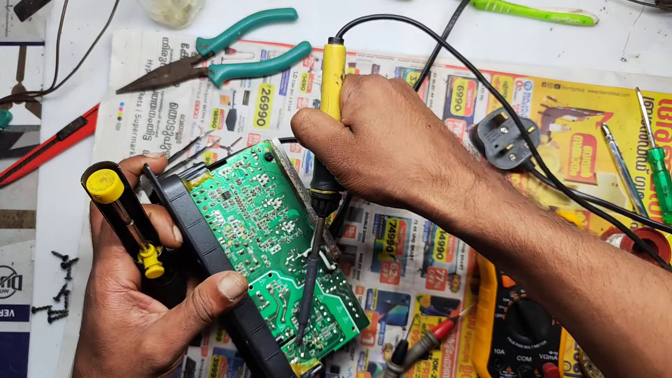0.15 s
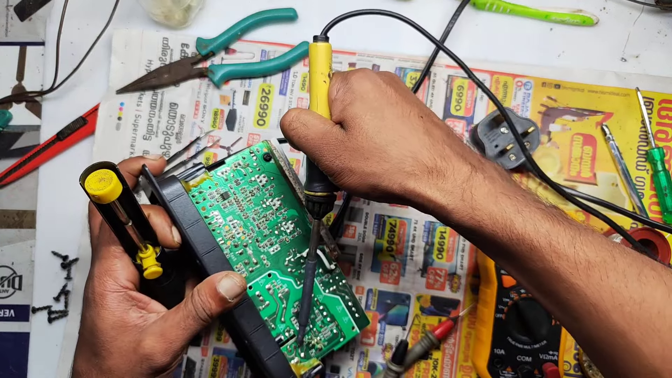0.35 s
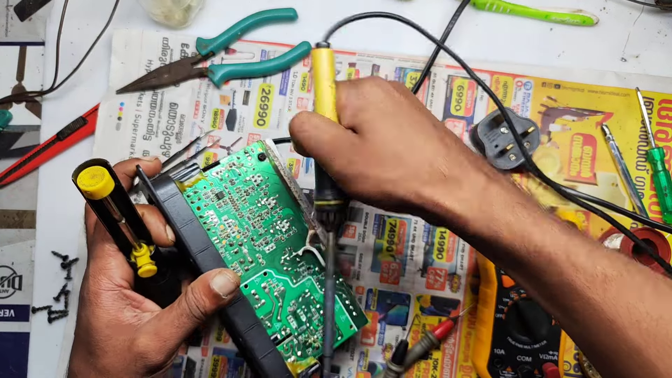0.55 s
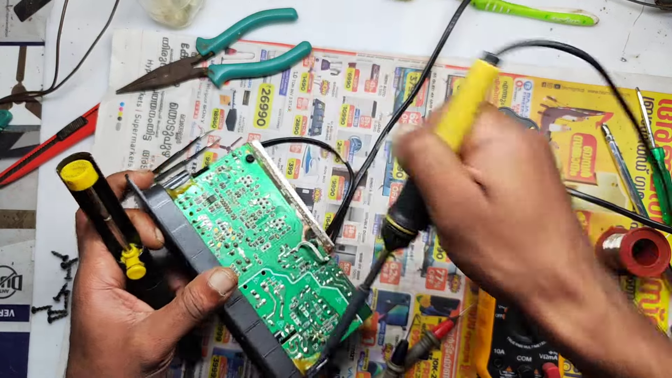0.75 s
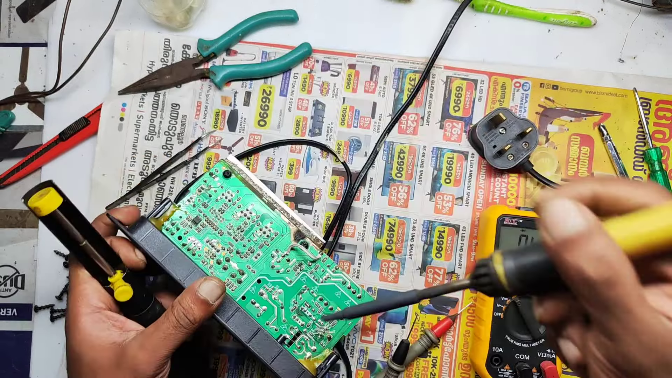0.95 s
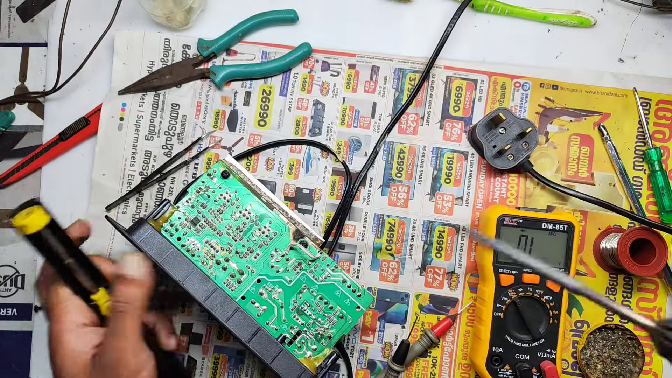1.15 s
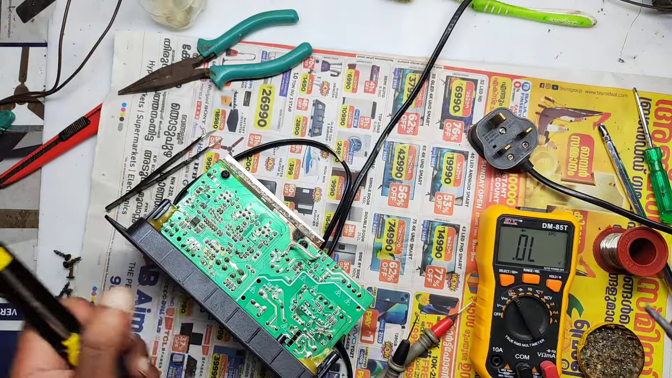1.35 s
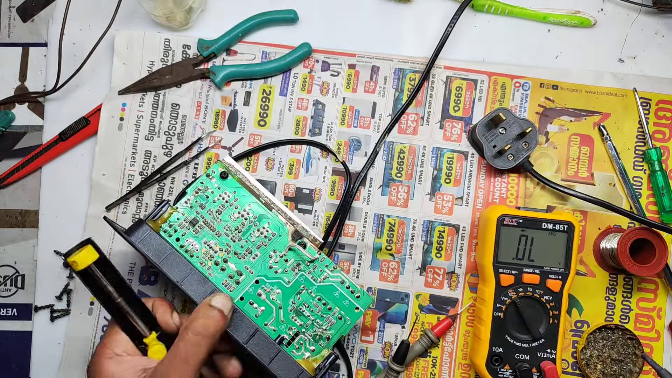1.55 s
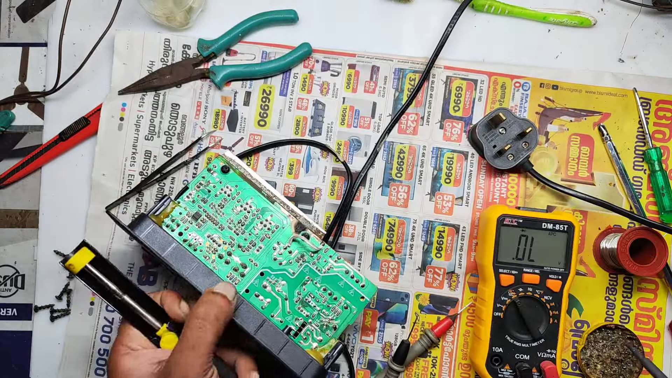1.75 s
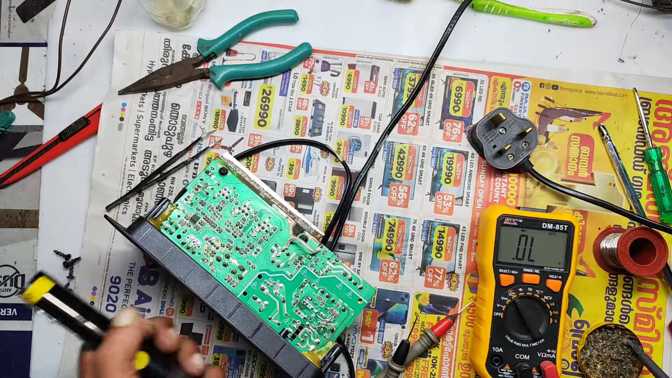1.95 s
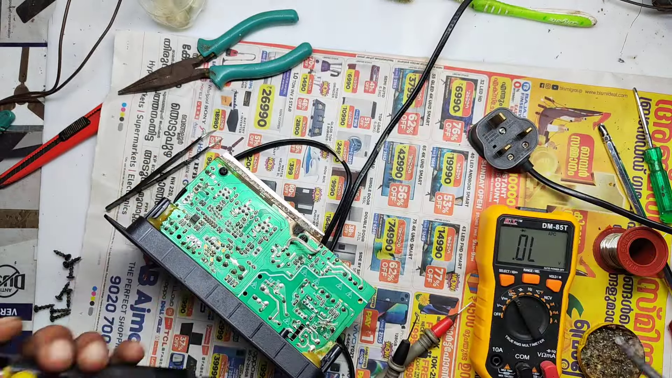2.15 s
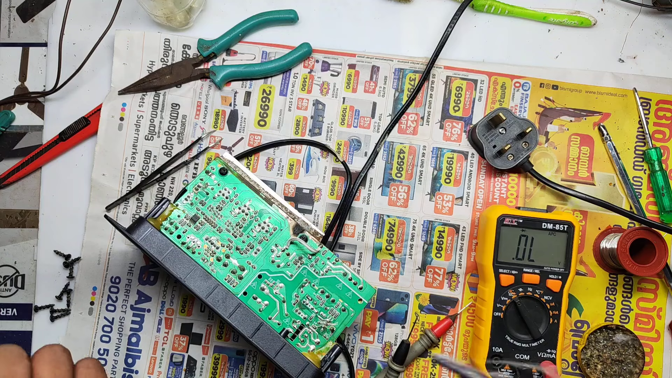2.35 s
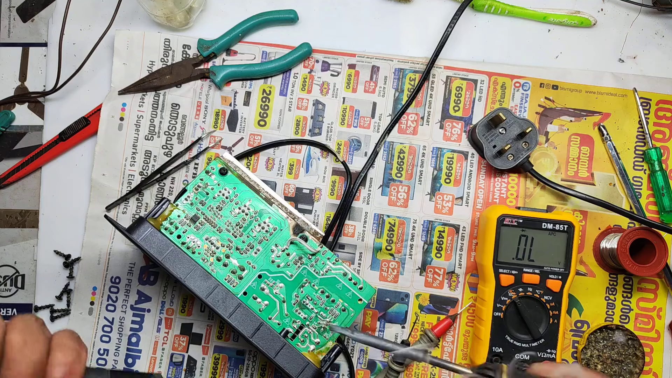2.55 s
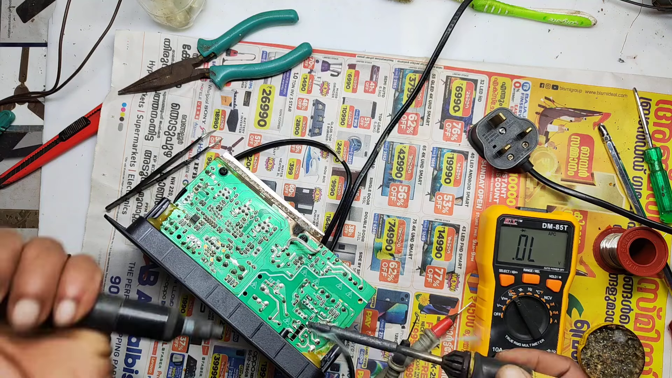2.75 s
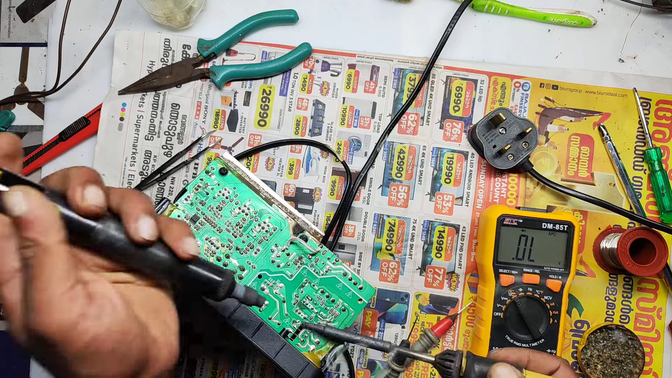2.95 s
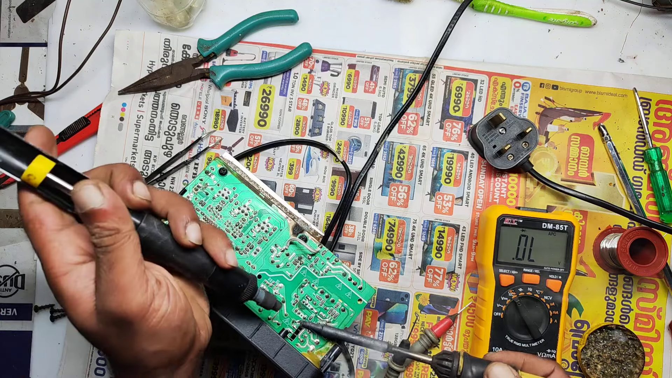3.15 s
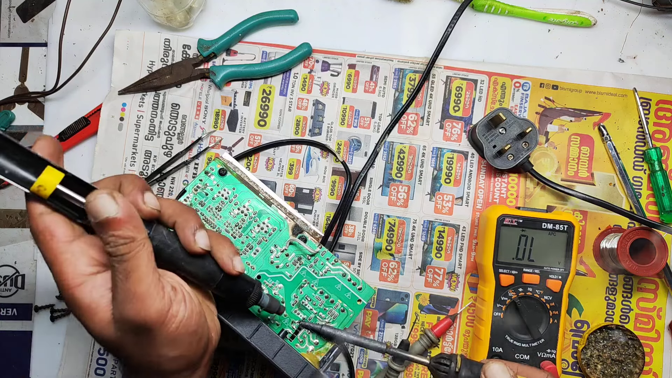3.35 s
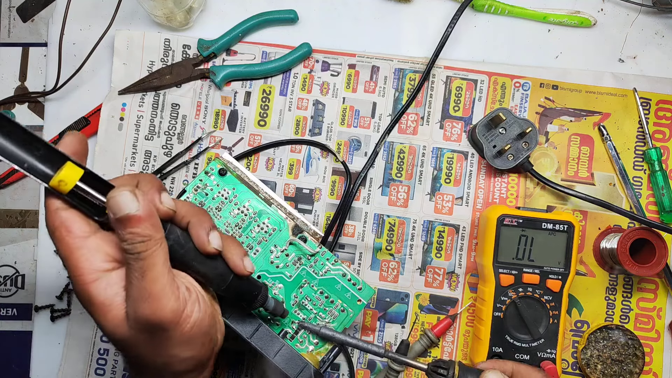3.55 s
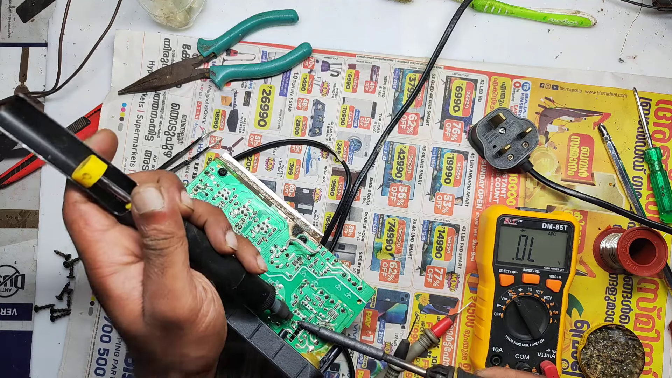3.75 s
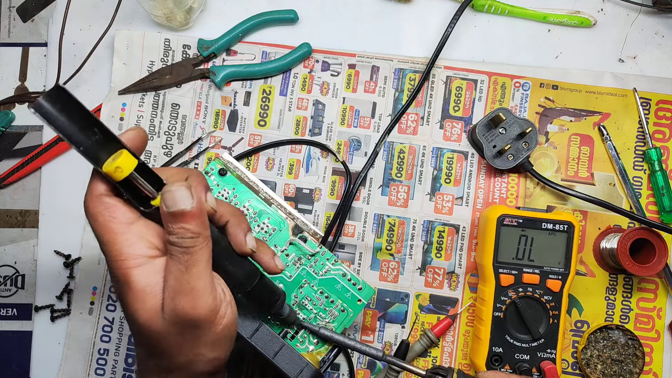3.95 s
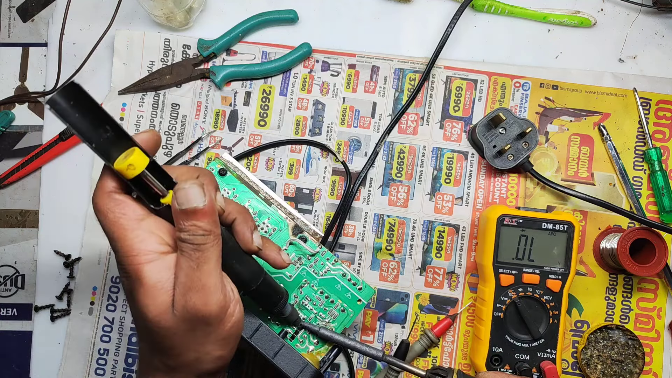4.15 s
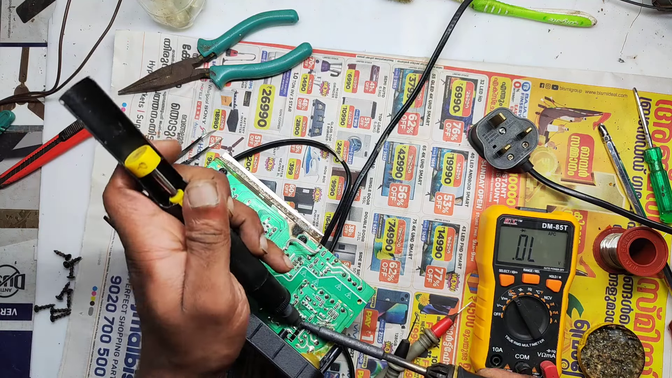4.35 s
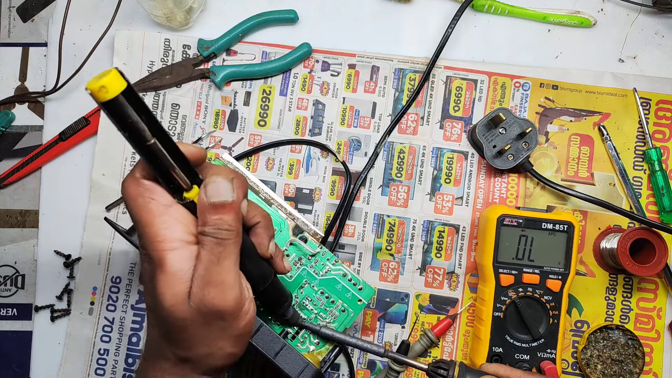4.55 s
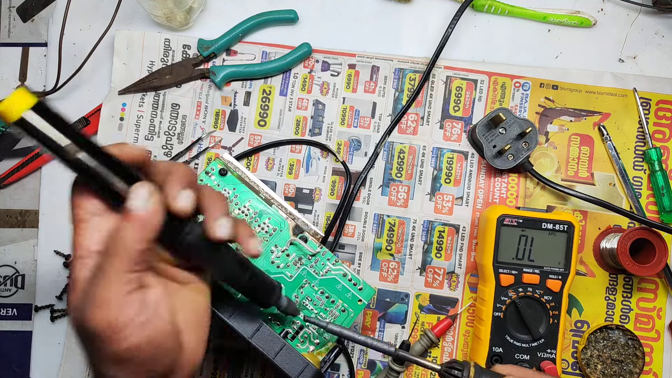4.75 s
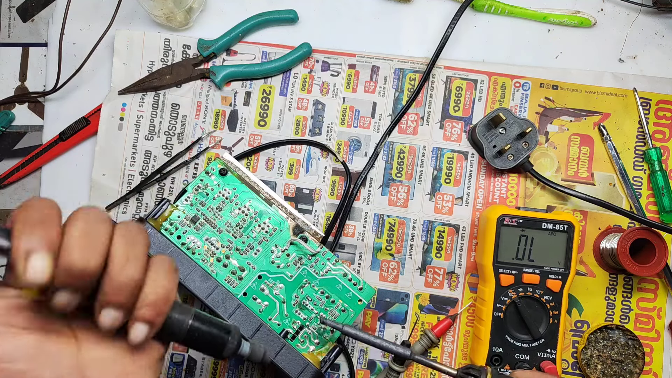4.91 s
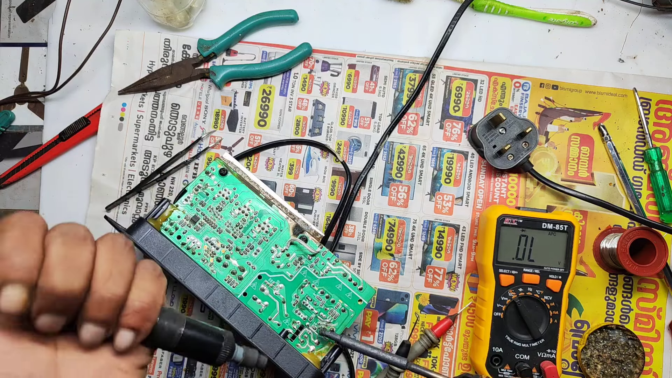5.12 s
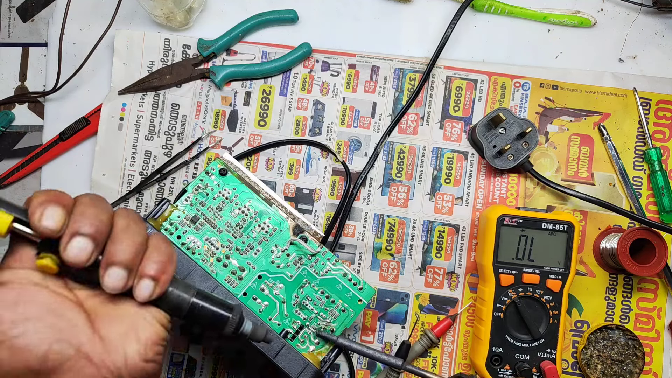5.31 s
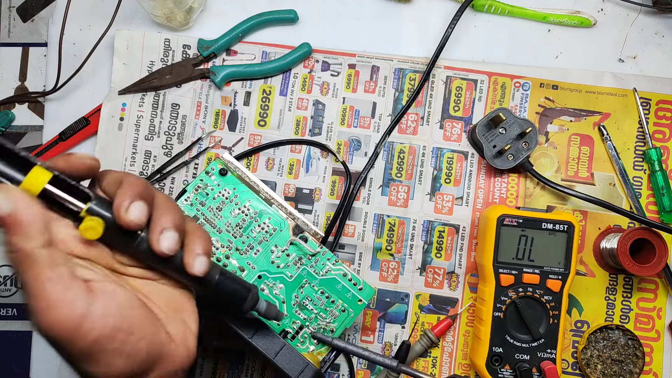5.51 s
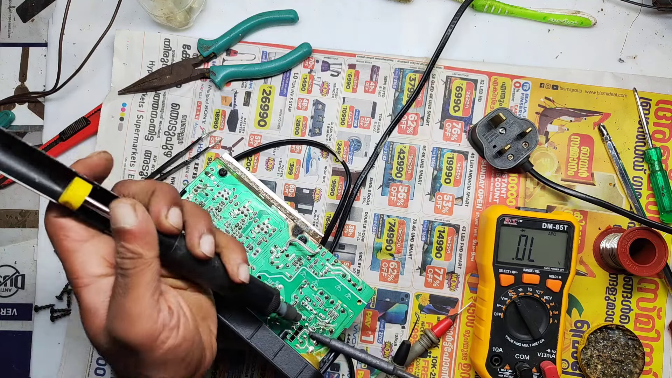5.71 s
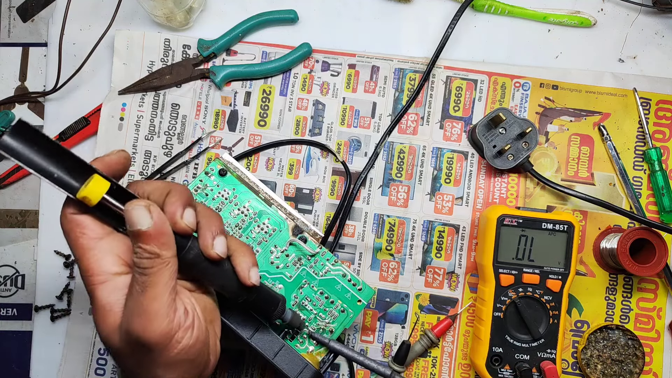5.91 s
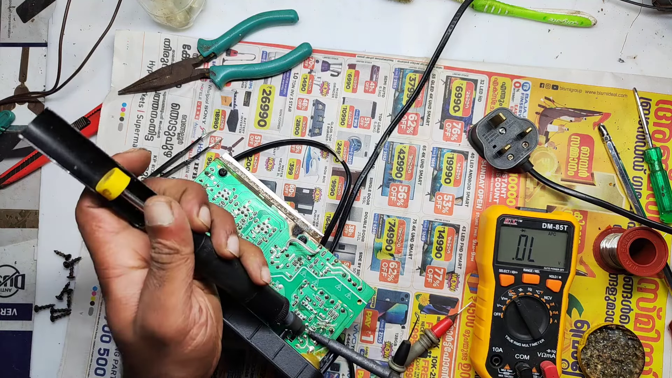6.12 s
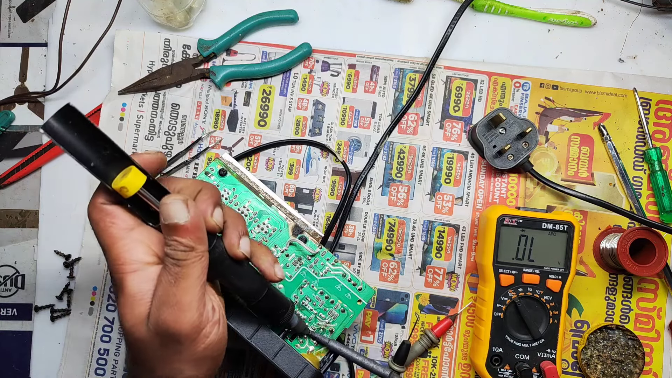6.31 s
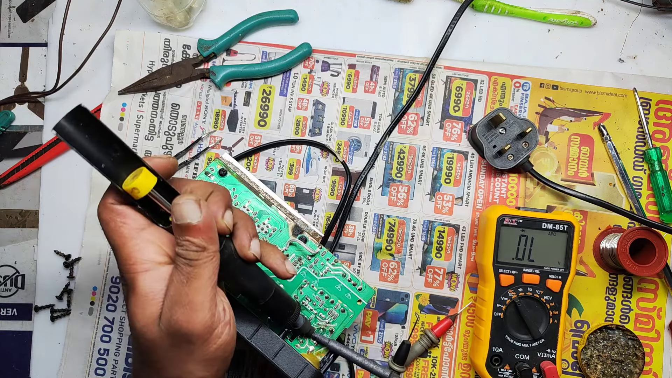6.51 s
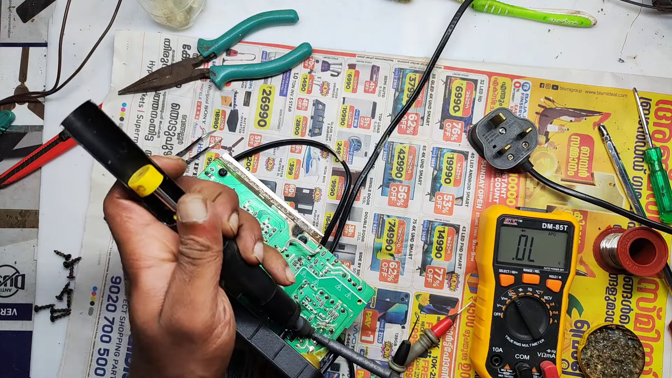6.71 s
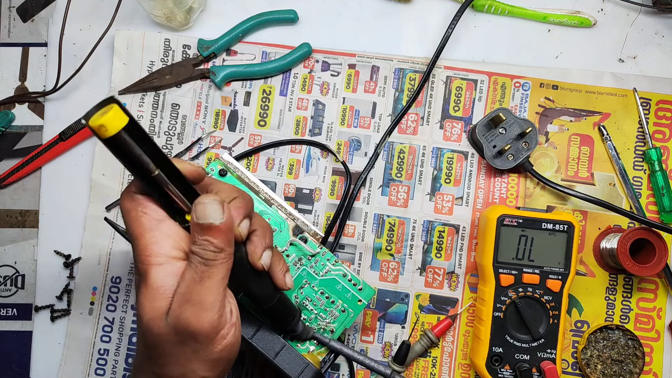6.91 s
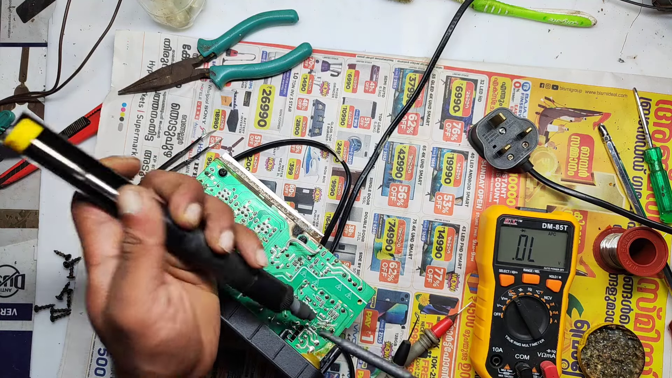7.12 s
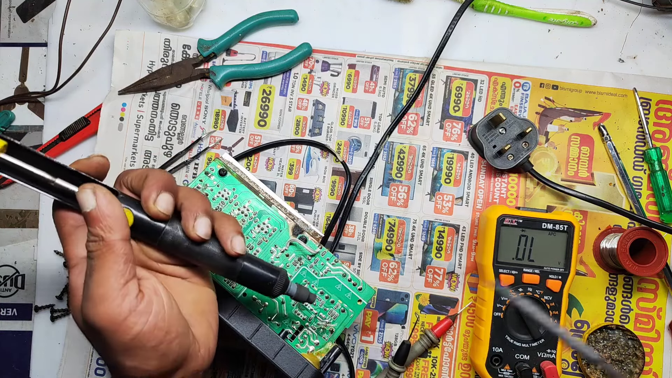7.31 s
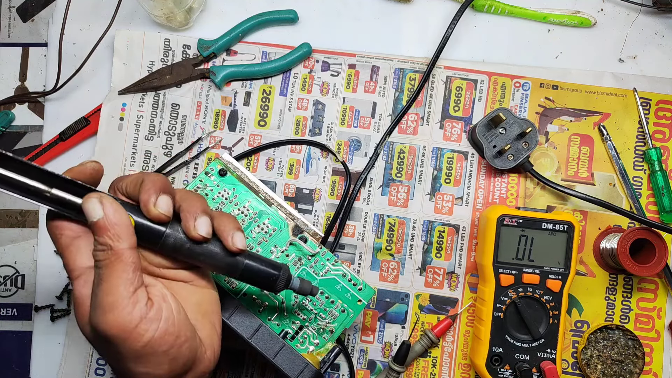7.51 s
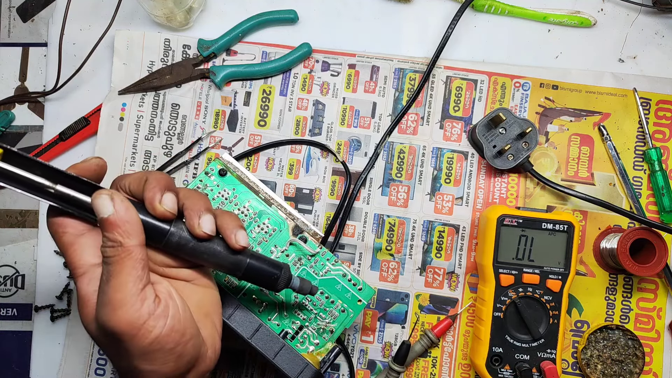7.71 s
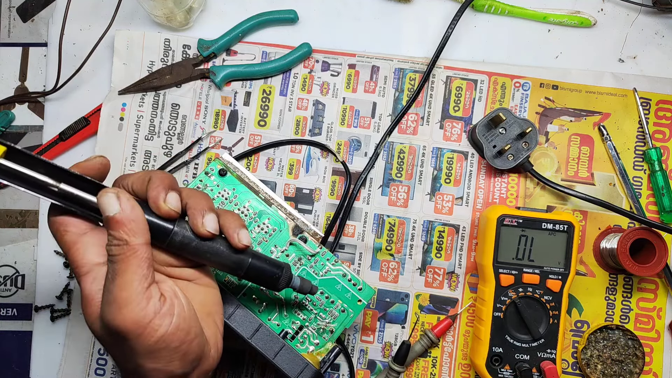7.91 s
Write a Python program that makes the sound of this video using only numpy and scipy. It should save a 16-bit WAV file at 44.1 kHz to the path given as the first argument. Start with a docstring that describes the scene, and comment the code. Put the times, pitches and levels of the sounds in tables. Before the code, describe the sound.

Workbench knocks and paper rustle, a brief hot sizzle, then a spring-loaded solder sucker cocked and fired twice with sharp snaps and airy thumps.

```python
"""Desoldering at a workbench

First, and more sparsely later, hands shift the board and tools over newspaper in a small room; the hot iron
sizzles briefly before a spring-loaded solder sucker is cocked twice and fired twice against a circuit board.
Cocking is a sliding hiss and tone, a latch snap and a plunger knock; firing is a click, a rush of air and a thump.
Noise bursts shaped by colour make the contacts, air and paper; fading sine waves make the ringing parts."""
import sys
import numpy as np
from scipy import signal
from scipy.fft import rfft, irfft, next_fast_len
from scipy.io import wavfile
from scipy.ndimage import map_coordinates

SR = 44100
rng = np.random.default_rng(int(sys.argv[2]) if len(sys.argv) > 2 else 0)


def transcribe(u):
    """Save the signal u as a 16-bit wav file named by the first command-line argument.

    u: samples, shape (n,) or (channels, n), limited to [-1, 1]; the rate is SR.
    q: integer samples, one column per channel.
    """
    v = np.clip(np.atleast_2d(u).T, -1, 1)
    q = np.round(v * 32767).astype(np.int16)
    wavfile.write(sys.argv[1], SR, q)


N = 355887
TIME = np.arange(N) / SR  # seconds from the start
AGE = np.arange(SR // 2) / SR  # seconds since a blow; t60 below is the time to fade by 60 dB


def amp(db):
    """Turn decibels into gain."""
    return 10 ** (np.asarray(db) / 20)


def along(points, hz):
    """Read a curve of (f/Hz, value) points at any frequency, on a log axis."""
    f, value = np.transpose(points)
    return np.interp(np.log(hz + 1), np.log(f + 1), value)


def unit(x):
    """Scale to rms 1, so that levels compare."""
    return x / np.sqrt(np.mean(x ** 2) + 1e-20)


def blow(x):
    """Scale a short sound to an average energy of 1 per channel."""
    return unit(x) / np.sqrt(x.shape[-1])


def add(track, start, x):
    """Mix a sound into the track from a start time in seconds."""
    part = track[:, round(start * SR):][:, :x.shape[-1]]
    part += x[..., :part.shape[-1]]


def colour(x, spectrum):
    """Filter to the given spectrum with minimum phase, so nothing sounds before its cause."""
    m = 2 * next_fast_len(x.shape[-1] // 2 + SR // 10)
    gain_db = along(spectrum, np.fft.rfftfreq(m, 1 / SR))
    # Folding the cepstrum moves the filter's response to after time zero
    cepstrum = irfft(np.log(amp(gain_db)))
    cepstrum[1:m // 2] *= 2
    cepstrum[m // 2 + 1:] = 0
    response = np.exp(rfft(cepstrum))
    return irfft(rfft(x, m) * response, m)[..., :x.shape[-1]]


def noise(size, alike):
    """Stereo white noise; alike is the share of power common to both sides."""
    common = rng.standard_normal(size)
    separate = rng.standard_normal((2, size))
    return np.sqrt(alike) * common + np.sqrt(1 - alike) * separate


def wobble(rate):
    """A smooth random curve through rate random points a second."""
    return map_coordinates(rng.standard_normal(int(N * rate / SR) + 4), [TIME * rate])


def strike(spectrum, t60, scatter):
    """A sharp contact followed by a short rattle of the touching parts."""
    click = AGE == 0
    rattle = blow(noise(len(AGE), alike=0.46) * amp(-60 * AGE / t60))
    return blow(colour(click + scatter * rattle, spectrum))


def tube(hz, t60):
    """A hollow body rings strongly for a few milliseconds after a blow."""
    build_up = 1 - np.exp(-AGE / 0.0015)
    return blow(np.cos(2 * np.pi * hz * AGE) * amp(-60 * AGE / t60) * build_up)


def ring(modes, blur_hz):
    """Fading tones whose phases wander at random, which makes the ringing rough rather than pure."""
    hz, db, t60 = np.transpose(modes)[..., None]
    steps = rng.standard_normal((2, len(modes), len(AGE))) * np.sqrt(2 * np.pi * blur_hz / SR)
    drift = np.cumsum(steps, -1)
    tones = amp(db - 60 * AGE / t60) * np.sin(2 * np.pi * hz * AGE + drift)
    return blow(np.sum(tones, axis=1))


# Colour of a low push on the board: (f/Hz, relative level/dB)
PUSH_COLOUR = [(25, -20), (60, -5.5), (125, 3.5), (200, -8), (300, 0.5), (500, -11.5), (1000, -33),
               (4000, -72)]
# Ringing of the board's case: (f/Hz, relative level/dB, t60/s)
BOARD_MODES = [(71.6, -24.5, 0.047), (121, -4, .14), (135.8, 2, 0.2), (195.8, -7.5, 0.27), (226, -3, 0.18),
               (278.7, -8.5, 0.18), (405, -19.5, 0.31)]


def thump(ring_share, t60):
    """A low push on the board, which rings in its case."""
    push = blow(colour(noise(len(AGE), alike=0.98) * amp(-60 * AGE / t60), PUSH_COLOUR))
    hz, db, life = np.transpose(BOARD_MODES)[..., None]
    tones = amp(db - 60 * AGE / life) * np.sin(2 * np.pi * hz * AGE)
    case = np.sum(tones, axis=0) * (1 - np.exp(-AGE / 0.012))  # the ringing builds up
    return blow(push + ring_share * blow(case))


# How long the room's echo lasts: (f/Hz, t60/s)
ROOM_DECAY = [(100, 0.46), (400, 0.24), (1000, 0.39), (3000, 0.23), (8000, 0.25), (14000, 0.28)]


def in_room(x, wet_db, left_db=3.0, lead=.00026):
    """Sound reaches the right lead seconds late; left_db lifts left and lowers right; the room echoes diffusely."""
    hz, t, z = signal.stft(rng.standard_normal((2, len(AGE))), SR, nperseg=256)
    alike = np.exp(-hz / 900)[:, None]  # long waves reach both microphones alike
    z[1] = alike * z[0] + np.sqrt(1 - alike ** 2) * z[1]
    decay = amp(-60 * t / along(ROOM_DECAY, hz)[:, None])
    tail = signal.istft(z * decay, SR, nperseg=256)[1][:, :len(AGE)]
    tail = blow(tail * (1 - np.exp(-AGE / 0.0012)))
    echo = signal.fftconvolve(x, tail, axes=1)[:, :x.shape[-1]]
    late_right = np.pad(x[1], (round(lead * SR), 0))[:x.shape[-1]]
    direct = np.array([x[0], late_right]) * amp([[left_db], [-left_db]])
    return direct + amp(wet_db) * echo


# Level of the low rumble, before its small random sway: (t/s, level/dB)
RUMBLE_LEVEL = [(0, -65.5), (2.3, -65), (3.7, -64), (4.3, -66), (5.7, -66), (8.07, -67)]
# Colours of the rumble and the hiss: (f/Hz, relative level/dB)
RUMBLE_COLOUR = [(15, -51.5), (25, -18), (130, -1.5), (151, -4), (171, -12), (202, -1), (257, -12),
                 (299, -8.5), (369, -10), (401, -5.5), (700, -20), (910, -52), (1540, -120)]
HISS_COLOUR = [(100, -13), (500, -3), (1000, -0.5), (2000, -5.5), (4000, -10.5), (7300, -21.5), (9500, -15),
               (12000, -10.5), (14500, -18)]


def background(hiss_db=-73):
    """A low, uneven rumble, much of it common to both sides, under a faint steady hiss."""
    sway = amp(np.interp(TIME, *np.transpose(RUMBLE_LEVEL)) + wobble(11))
    rumble = sway * unit(colour(noise(N, alike=0.67), RUMBLE_COLOUR))
    hiss = unit(colour(noise(N, alike=0.26), HISS_COLOUR))
    return (rumble + amp(hiss_db) * hiss) * amp([[.9], [-.9]])  # dB: slightly louder on the left


SLIDE_RANGE_DB = 24  # a slide swells by this much over its rise and fades by it over its fall


def slide_gain(peak, rise, fall):
    """Loudness of a movement that speeds up until its peak time and then slows down."""
    return amp(-SLIDE_RANGE_DB * np.maximum((peak - TIME) / rise, (TIME - peak) / fall))


# Hands, board and cable slide over paper:
# (fastest at t/s, rise/s, fall/s, level/dB, brightness/dB per octave)
SLIDES = [(0.054, 0.044, 0.072, -66.5, 1.5), (.585, 0.099, 0.097, -53, 1.5), (.675, 0.047, 0.062, -54.5, 2),
          (.722, 0.079, 0.082, -54, 2.5), (.80, .05, .45, -54.5, 2), (1.065, .05, 0.073, -54, 1),
          (1.365, .18, 0.17, -52.5, -2.8), (1.652, 0.15, 0.052, -54, 0.9),
          (1.741, 0.062, 0.068, -61.5, 1.5), (2.14, .1, .27, -67, 1), (2.47, 0.23, 0.19, -61.5, 0),
          (3.05, 0.17, 0.2, -69, 3), (4.679, 0.16, 0.12, -63.5, 3), (5.7, 0.25, 0.21, -71.5, 2),
          (5.939, .14, 0.053, -70, -2), (7.05, 0.19, 0.18, -68, 1.5)]
# Colour of rubbed paper: (f/Hz, relative level/dB)
PAPER_COLOUR = [(60, -18), (200, -11.5), (400, 0), (700, -3.5), (1200, 0), (2000, -4), (3500, -11),
                (5000, -14.5), (7500, -24.5), (11000, -21.5), (14500, -28)]
PAPER_PIVOT_HZ = 1300  # brightness tilts the paper's colour about this point


def rubbing():
    """Each slide swells and fades; the paper rubs in uneven slips, brighter or duller with the contact."""
    out = np.zeros((2, N))
    for peak, rise, fall, db, tilt_db in SLIDES:
        start = max(peak - 2 * rise, 0)
        end = peak + 2 * fall
        gain = slide_gain(peak, rise, fall)[round(start * SR):round(end * SR)]
        tilted = [(hz, band_db + tilt_db * np.log2(hz / PAPER_PIVOT_HZ)) for hz, band_db in PAPER_COLOUR]
        paper = unit(colour(noise(len(gain), alike=0.1), tilted))
        add(out, start, amp(db) * gain * paper)
    slips = unit(amp(2.4 * wobble(400) + .9 * wobble(40)))  # fast and slow unevenness
    return in_room(slips * out, wet_db=-6.5, left_db=1.0, lead=0)


# Board and tools touch: (t/s, knock level/dB, body resonance f/Hz, thud level/dB, tick level/dB)
TOUCHES = [(.472, -44, 400, -32, -47), (.515, -26.5, 1180, -20.5, -22.5), (.528, -22.5, 1310, -17.5, -34),
           (.776, -28.5, 1400, -45, -30.5), (.821, -29, 406, -23.5, -50), (.999, -32, 1130, -46, -46),
           (1.360, -26.5, 1750, -55, -51), (1.3855, -12.5, 1930, -36, -36), (1.495, -29, 423, -28, -48),
           (1.5315, -32.5, 630, -32, -44), (1.544, -39, 2780, -50, -26), (1.558, -23.5, 970, -40, -51),
           (1.601, -28.5, 1390, -55, -37), (1.654, -28, 1320, -38, -48), (1.814, -30.5, 2570, -29.5, -47),
           (1.877, -34.5, 330, -24.5, -54), (1.916, -30, 340, -23.5, -47), (2.033, -35.5, 3880, -43, -22.5),
           (2.485, -28.5, 550, -36.5, -40), (2.547, -28.5, 2800, -35, -35.5),
           (2.905, -33.5, 446, -32.5, -47), (3.110, -36, 1075, -44, -41.5), (3.259, -36.5, 3500, -32, -35),
           (3.887, -36.5, 676, -32, -55), (5.538, -37, 1230, -31, -42.5), (5.959, -32.5, 298, -27, -49),
           (6.068, -30, 610, -33, -52), (6.354, -41, 1076, -45, -62), (6.454, -38, 1170, -38, -56),
           (7.03, -47, 400, -32.5, -60)]
# Colours of a knock and of a hard tick, the tick also used further down: (f/Hz, relative level/dB)
KNOCK_COLOUR = [(80, -27), (350, 13), (700, 8), (1400, 4), (3500, -1), (6000, -17.5), (14000, -47.5)]
TICK_COLOUR = [(500, -29), (3000, -2), (5000, 2.5), (7300, -4.5), (10000, 0.5), (14500, -3.5)]


def handling():
    """Each touch has a knock with its own resonance, a thud of the case and a hard tick."""
    out = np.zeros((2, N))
    for s, knock_db, body_hz, thud_db, tick_db in TOUCHES:
        contact = strike(KNOCK_COLOUR, t60=.025, scatter=1.6)
        body = .7 * tube(body_hz, t60=14 / body_hz)
        knock = amp(knock_db) * (contact + body)
        thud = amp(thud_db) * thump(ring_share=0.47, t60=0.025)
        tick = amp(tick_db) * strike(TICK_COLOUR, t60=0.038, scatter=4.5)
        add(out, s, in_room(knock + thud + tick, wet_db=-3, left_db=1, lead=.00015))
    return out


# The hot tip is wiped: (start t/s, lifted at t/s, level/dB)
WIPE = (1.832, 2.063, -53)
# Colour of the steam: (f/Hz, relative level/dB)
STEAM_COLOUR = [(300, -23), (2000, -7.5), (4500, -4), (7000, -6), (10000, 3), (14000, 1.5)]
WIPE_ATTACK_S, WIPE_T60_S = 0.14, 0.25  # steam builds up, then dies once the tip lifts


def sizzle():
    """The hot tip is wiped and spits: bright noise flickers quickly in level, like a fine crackle."""
    start, lifted, db = WIPE
    build_up = np.clip((TIME - start) / WIPE_ATTACK_S, 0, 1)
    steam = build_up * amp(db - 60 * np.maximum(TIME - lifted, 0) / WIPE_T60_S)
    flicker = amp(3.5 * wobble(990))
    spit = unit(flicker * colour(noise(N, alike=.4), STEAM_COLOUR))
    return steam * in_room(spit, wet_db=-9, left_db=.5)


# The piston is pushed down the barrel: (start t/s, end t/s, level/dB that hiss and tone are set against)
STROKES = [(2.413, 2.59, -67.5), (5.037, 5.237, -63.5)]


def sliding(start_hz=1750, end_hz=980, width_hz=150):
    """Air hisses past the piston; the lengthening air column sounds its first and third quarter-wave tones."""
    out = np.zeros((2, N))
    leak_colour = [(300, -15.5), (1500, 1.5), (2600, 2), (6000, -11), (14000, -12.5)]  # f/Hz, level/dB
    for start, end, db in STROKES:
        travel = np.clip(AGE / (end - start), 0, 1)
        # Wavelength grows with the air column, so it is 1 / pitch that moves with travel
        pitch = 1 / (1 / start_hz + travel ** 0.89 * (1 / end_hz - 1 / start_hz))
        phase = 2 * np.pi * np.cumsum(pitch) / SR
        # A random level makes each tone breathy
        first = wobble(2 * width_hz)[:len(AGE)] * np.sin(phase)
        third = wobble(2 * width_hz)[:len(AGE)] * np.sin(3 * phase)
        column = 1.15 * first + 1.7 * travel ** 2 * third
        leak = unit(colour(noise(len(AGE), alike=0.35), leak_colour))
        hiss = amp(9.5 - 14 * travel) * leak  # weakens along the stroke
        push = np.minimum(AGE / 0.055, 1) * (travel < 1)
        add(out, start, amp(db) * in_room(push * (hiss + column), wet_db=-9.5))
    return out


# The latch catches the piston; the code trims the level a little:
# (t/s, level before trim/dB, left lift and right cut/dB, tube ring against the crack/dB)
LATCHES = [(2.5976, 3.5, 1.5, -10), (5.2421, 3.5, 4, -4.5)]
# The plunger flies back to its stop; the code trims the level a little:
# (t/s, level before trim/dB, left lift and right cut/dB, tube ring against the knock/dB,
#  flight/s, let go this long before t/s, let-go tick level/dB)
RETURNS = [(2.7130, -2.5, 1.5, -2, .011, 0.015, -20.5), (5.3616, -2.5, 2.5, 5, 0.012, 0.017, -17)]
# Colours of the latch and of the plunger's stop: (f/Hz, relative level/dB)
LATCH_COLOUR = [(40, -47.5), (150, -28.5), (400, -19.5), (800, -18), (1500, -27), (2200, -12.5),
                (2800, -3.5), (3600, -1.5), (5000, -9), (6000, -7.5), (7300, -20.5), (9000, -8),
                (12000, -8), (14500, -13.5)]
STOP_COLOUR = [(40, -48), (160, -22.5), (250, -4), (350, -1), (800, -14), (1300, -30), (2200, -17),
               (2800, -3), (3500, -37.5), (4500, -25), (5700, -10.5), (7300, -22), (9000, -14.5),
               (14500, -20)]
# Ringing of the spring and of the barrel: (f/Hz, relative level/dB, t60/s)
SPRING_MODES = [(383.6, -8.5, 0.16), (823.4, -10, 0.13), (2960, -3.5, 0.12), (3480, -6, 0.066),
                (3700, -4.5, 0.21), (4160, -12, .15), (5730, -10.5, 0.19), (8930, -7, .1)]
BARREL_MODES = [(370, -10, 0.2), (824, -3.5, 0.33), (816, 29, 0.073), (2570, -15, 0.053),
                (2610, -31, 0.061), (3550, -2, 0.42), (4700, -2, 0.17), (5670, -11, .13)]


def cocking():
    """The latch snaps shut; the freed plunger scrapes back ever louder and strikes the barrel."""
    out = np.zeros((2, N))
    for s, db, left_db, tube_db in LATCHES:
        # The catch rides over its edge just before the snap
        add(out, s - .0016, amp(db - 15) * strike(LATCH_COLOUR, t60=0.0081, scatter=4))
        crack = strike(LATCH_COLOUR, t60=.018, scatter=1.1)
        hollow = tube(hz=2790, t60=.016) + .65 * tube(hz=3480, t60=.009)
        spring = amp(-15.0) * ring(SPRING_MODES, blur_hz=22)
        snap = crack + amp(tube_db) * hollow + spring
        add(out, s, amp(db - 2.35) * in_room(snap, wet_db=-7.0, left_db=left_db))
    for s, db, left_db, tube_db, flight, let_go, tick_db in RETURNS:
        # The palm lets go
        slip = in_room(strike(TICK_COLOUR, t60=.02, scatter=2.5), wet_db=-6, left_db=1)
        add(out, s - let_go, amp(tick_db) * slip)
        swell = np.minimum(AGE / flight, 1) * (AGE < flight)
        scrape = blow(colour(noise(len(AGE), alike=1.0) * swell, LATCH_COLOUR))
        add(out, s - flight, amp(db - 6.0) * in_room(scrape, wet_db=-3.5))
        hit = strike(STOP_COLOUR, t60=0.024, scatter=4.9)
        hollow = amp(tube_db) * tube(hz=2820, t60=0.013)
        barrel = amp(-6.0) * ring(BARREL_MODES, blur_hz=21.6)
        knock = in_room(hit + hollow + barrel, wet_db=-10.5, left_db=left_db)
        add(out, s, amp(db - 1.0) * knock)
    return out


# Light metal contacts: (t/s, level/dB)
SMALL_TICKS = [(2.977, -42), (4.424, -46), (4.662, -55), (4.682, -54), (4.802, -46), (6.98, -48),
               (7.016, -44), (7.124, -41.5)]


def nicks(hz=3900):
    """Tiny pings of metal on solder, each with a slightly different pitch."""
    out = np.zeros((2, N))
    for s, db in SMALL_TICKS:
        pitch = hz * (1 + 0.013 * rng.standard_normal())
        ping = strike(TICK_COLOUR, t60=0.02, scatter=1.5) + 0.49 * tube(pitch, t60=0.013)
        add(out, s, amp(db) * in_room(ping, wet_db=-2.0))
    return out


def creak(s=3.958, pitch_hz=395, length=0.048, db=-56):
    """The case gives a short low creak under the pump's tip: a tone of unsteady pitch."""
    drift = 0.038 * wobble(62)[:len(AGE)]
    swell = np.sqrt(np.abs(np.sin(np.pi * np.minimum(AGE / length, 1))))
    tone = np.sin(2 * np.pi * np.cumsum(pitch_hz * (1 + drift)) / SR) * swell
    out = np.zeros((2, N))
    add(out, s, amp(db) * in_room(np.array([tone, tone]), wet_db=0.0))
    return out


# The pump fires: (t/s, trigger level/dB, air level/dB, piston travel/s, piston stop level/dB,
#  thump level/dB, thump delay/s, case ring share)
SHOTS = [(4.4513, -9, -5.5, .0168, -6.5, -3, 0.0041, 0.56),
         (6.8223, -9, -9.5, 0.023, -29.5, -4.5, 0.0013, 1)]
# Colours of the trigger and of the rushing air: (f/Hz, relative level/dB)
TRIGGER_COLOUR = [(80, -22), (400, -6.5), (1000, 2), (1800, -0.5), (2400, -1.5), (3400, -4), (6000, -7.5),
                  (14500, -10)]
AIR_COLOUR = [(60, 18), (400, -1), (800, -5.5), (1900, 1), (2700, -34), (3800, 3), (5300, 4.5),
              (6700, -6.5), (8500, 4), (10500, -2), (12500, 5), (14500, -6.5)]


def firing(air_t60=0.065, air_start_db=-5):
    """The trigger clicks, air and molten solder splutter in until the piston stops; the recoil thumps the board."""
    out = np.zeros((2, N))
    for s, trigger_db, air_db, travel, stop_db, thump_db, thump_delay, ring_share in SHOTS:
        # The trigger slips off the catch
        add(out, s - .0025, amp(trigger_db - 12) * strike(TRIGGER_COLOUR, t60=0.014, scatter=3.2))
        crack = strike(TRIGGER_COLOUR, t60=.06, scatter=1.7)
        hollow = amp(-8.5) * tube(hz=3000, t60=0.0067)
        add(out, s, amp(trigger_db) * in_room(crack + hollow, wet_db=-8.0))
        # Air grows until the piston stops, then dies away
        growth_db = air_start_db * np.maximum(1 - AGE / travel, 0)
        decay_db = -60 * np.maximum(AGE - travel, 0) / air_t60
        flow = amp(growth_db + decay_db)
        splutter = amp(2.2 * wobble(484)[:len(AGE)])
        rush = blow(colour(noise(len(AGE), alike=0.53) * flow * splutter, AIR_COLOUR))
        add(out, s, amp(air_db) * in_room(rush, wet_db=-6.0, left_db=7.5))
        stop = strike(TICK_COLOUR, t60=.025, scatter=1.5)
        add(out, s + travel, amp(stop_db) * in_room(stop, wet_db=-9, left_db=-3))
        recoil = in_room(thump(ring_share, t60=.07), wet_db=-15, left_db=0)
        add(out, s + thump_delay, amp(thump_db) * recoil)
    return out


def scene():
    """Everything on the bench, added together."""
    bench = background() + rubbing() + handling() + sizzle()
    pump = sliding() + cocking() + nicks() + creak() + firing()
    return bench + pump


TOP_HZ = 14520  # upper band limit


def record(dry):
    """The small microphones lose the deepest bass, and almost nothing is kept above the band limit."""
    thin = signal.sosfilt(signal.butter(3, 50, "highpass", fs=SR, output="sos"), dry)
    m = next_fast_len(N + SR)
    rolloff = 1 / np.sqrt(1 + (np.fft.rfftfreq(m, 1 / SR) / TOP_HZ) ** 200)  # very steep
    return irfft(rfft(thin, m) * rolloff, m)[:, :N]


dry = scene()
out = record(dry)
transcribe(out)
```